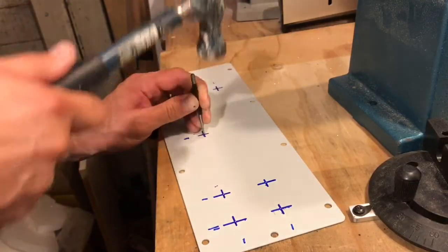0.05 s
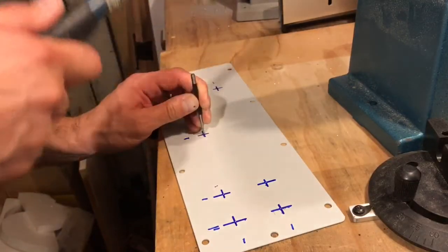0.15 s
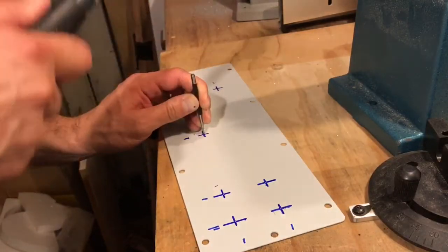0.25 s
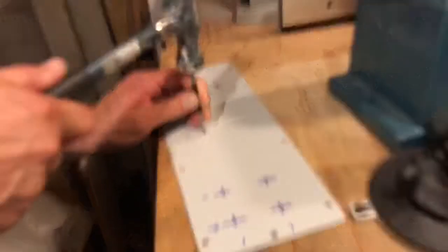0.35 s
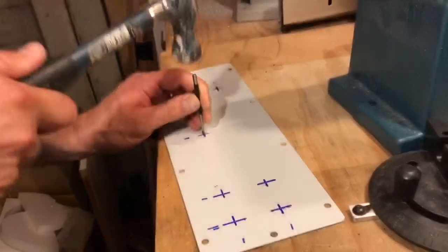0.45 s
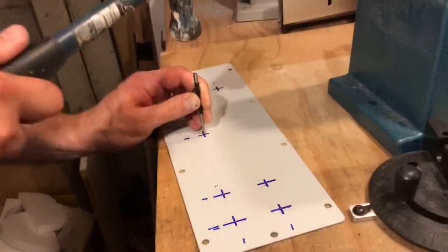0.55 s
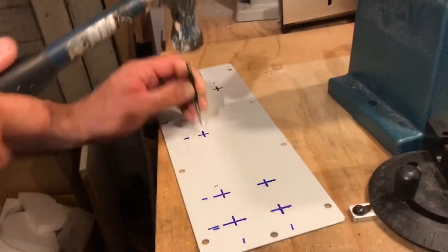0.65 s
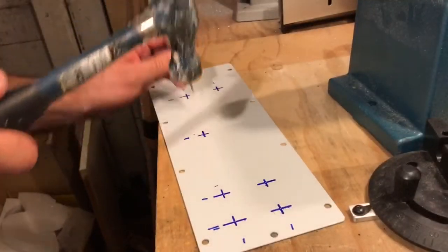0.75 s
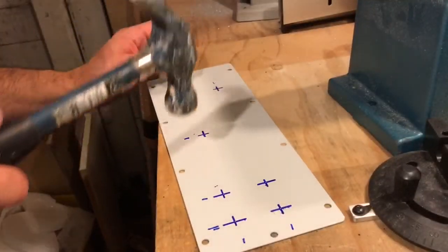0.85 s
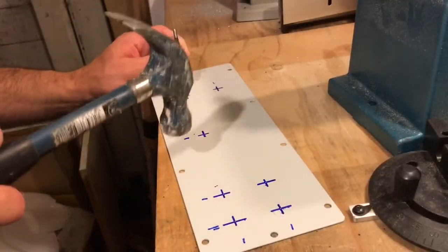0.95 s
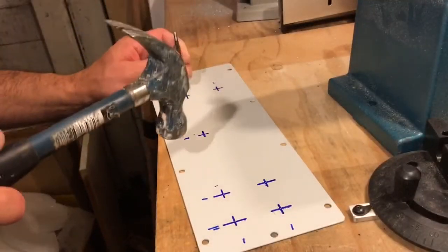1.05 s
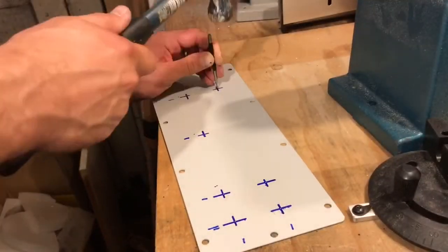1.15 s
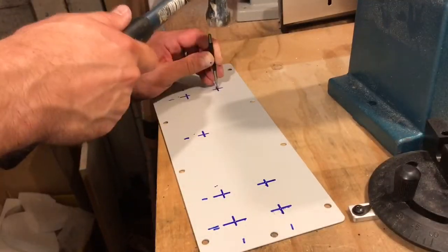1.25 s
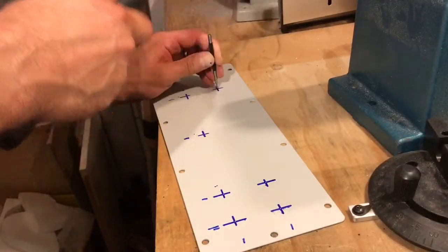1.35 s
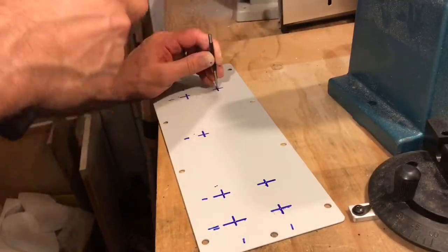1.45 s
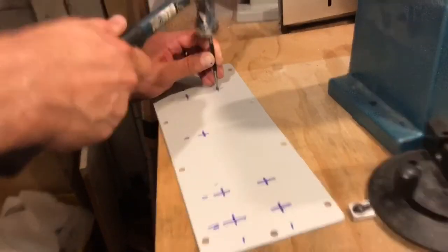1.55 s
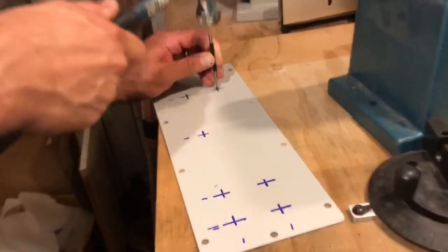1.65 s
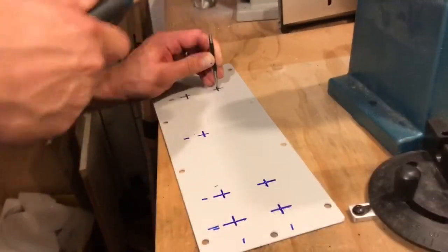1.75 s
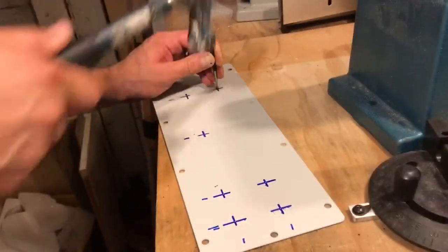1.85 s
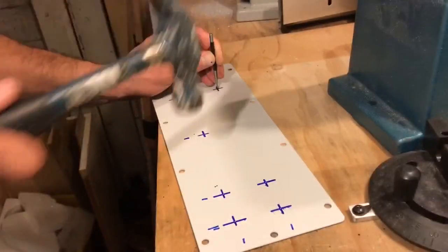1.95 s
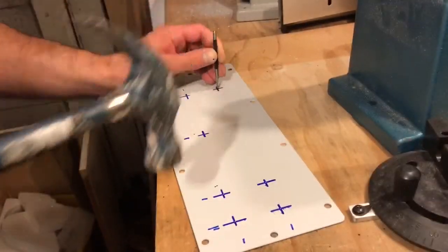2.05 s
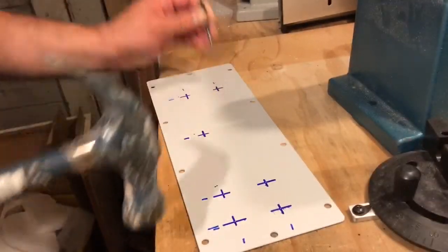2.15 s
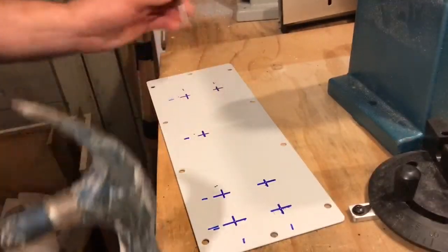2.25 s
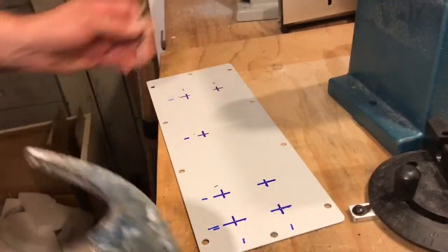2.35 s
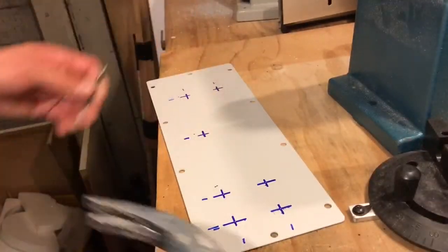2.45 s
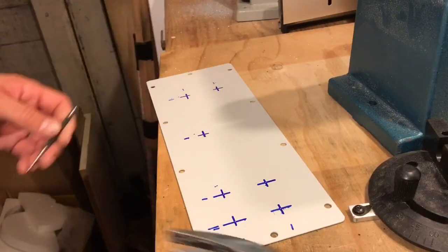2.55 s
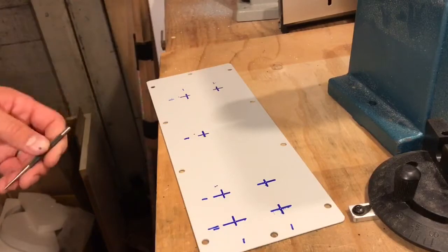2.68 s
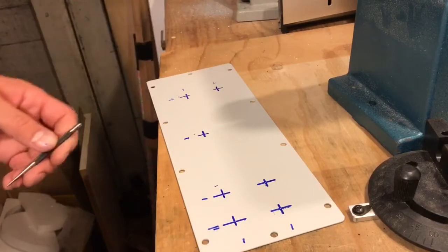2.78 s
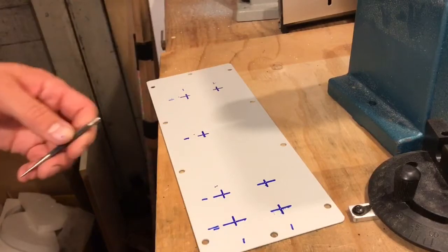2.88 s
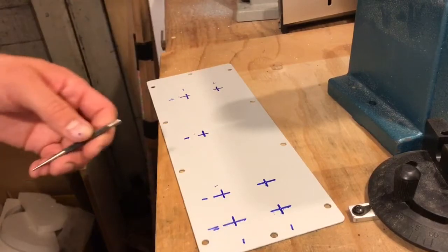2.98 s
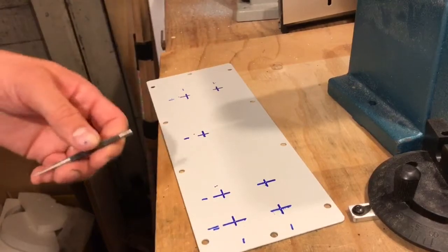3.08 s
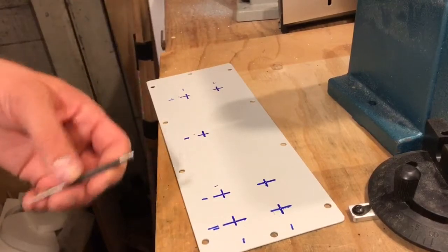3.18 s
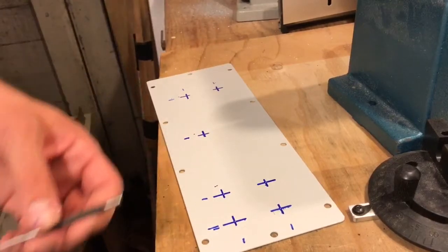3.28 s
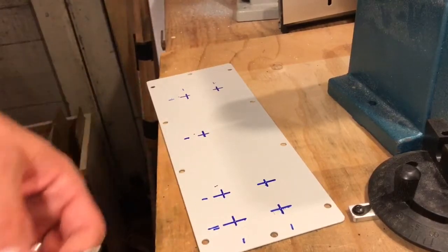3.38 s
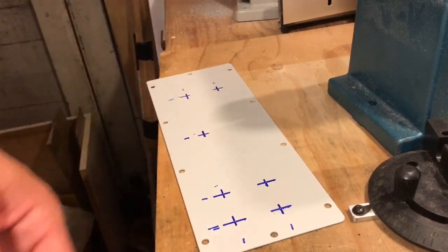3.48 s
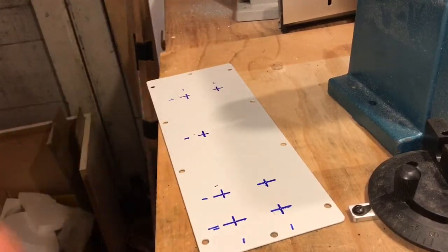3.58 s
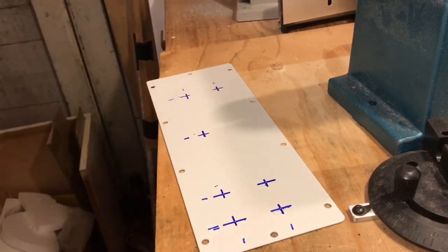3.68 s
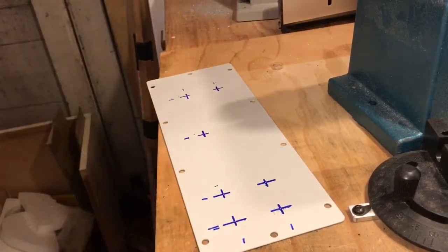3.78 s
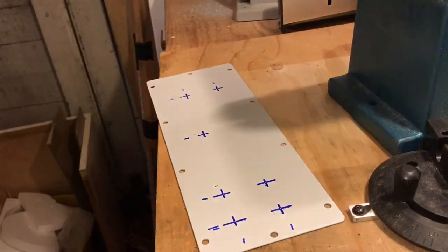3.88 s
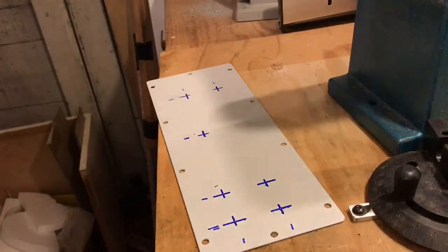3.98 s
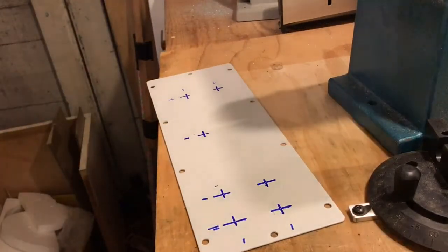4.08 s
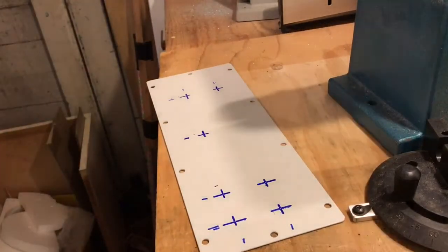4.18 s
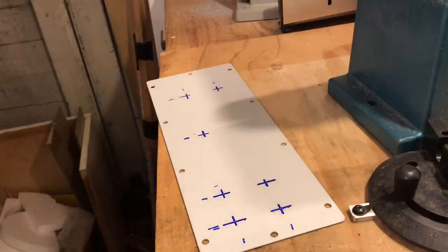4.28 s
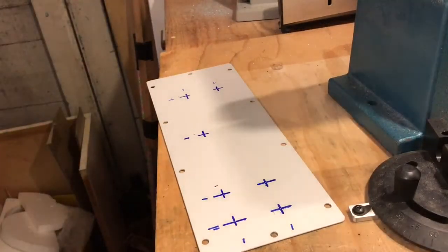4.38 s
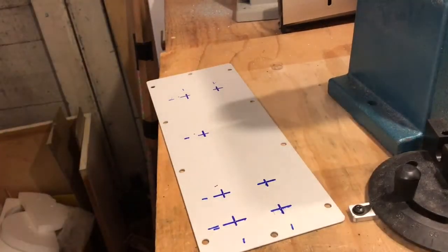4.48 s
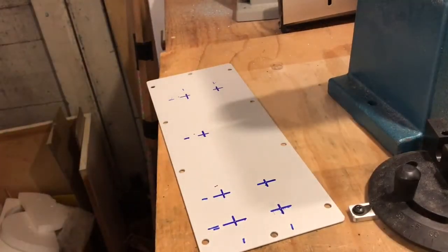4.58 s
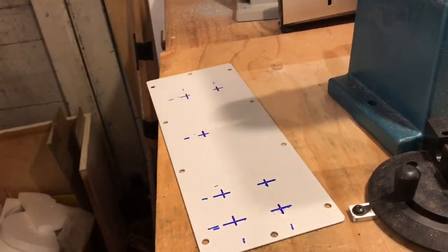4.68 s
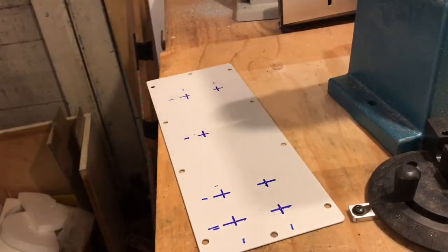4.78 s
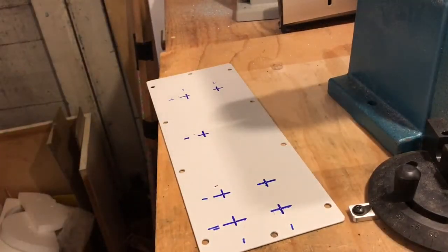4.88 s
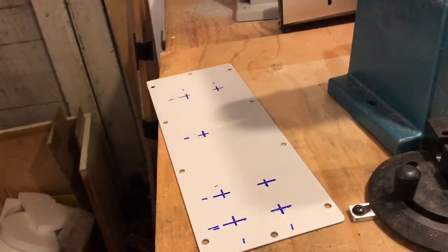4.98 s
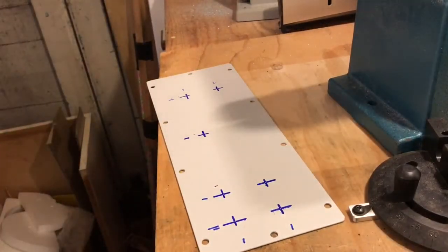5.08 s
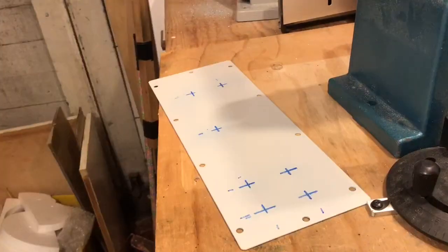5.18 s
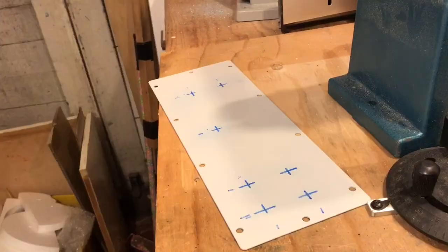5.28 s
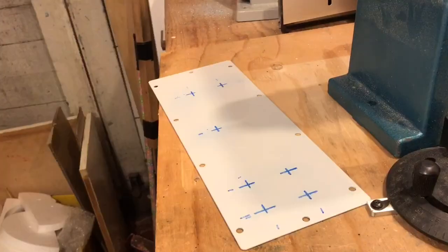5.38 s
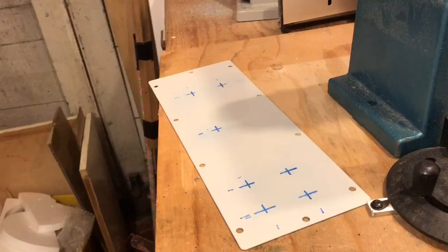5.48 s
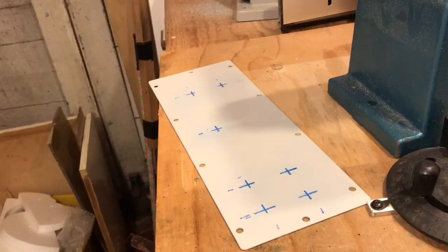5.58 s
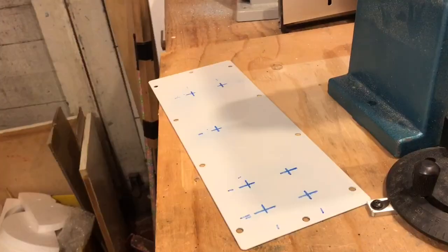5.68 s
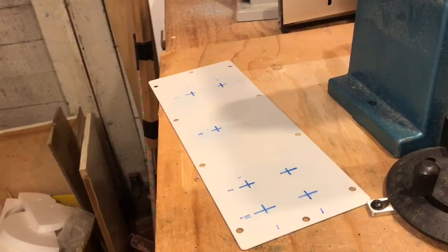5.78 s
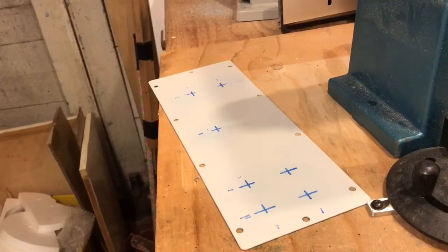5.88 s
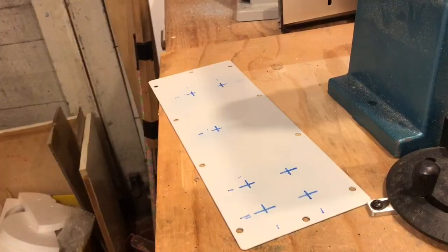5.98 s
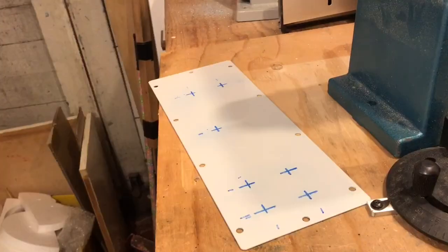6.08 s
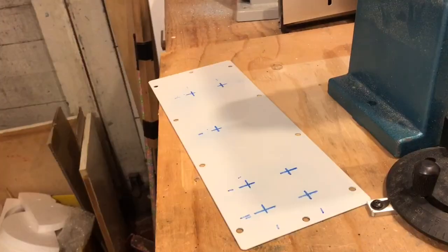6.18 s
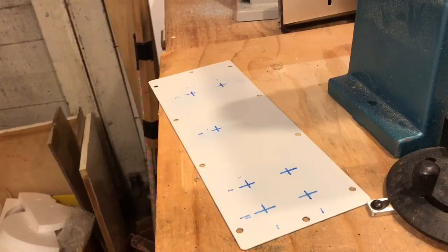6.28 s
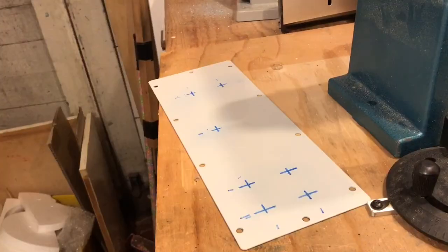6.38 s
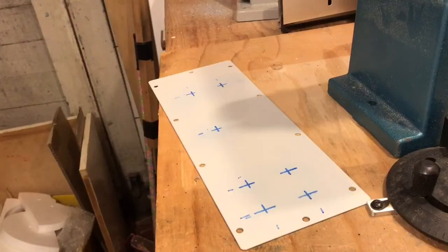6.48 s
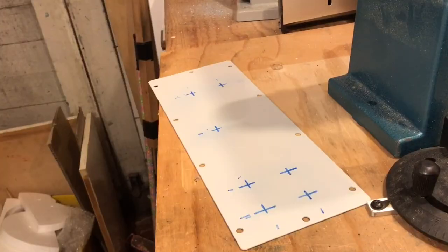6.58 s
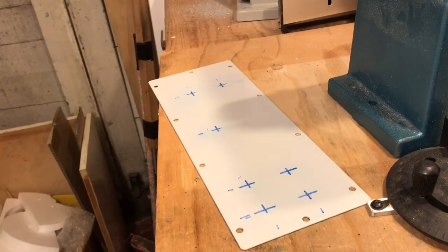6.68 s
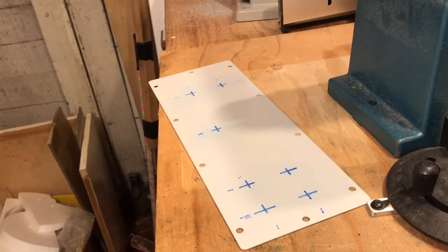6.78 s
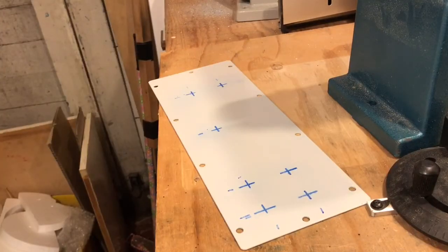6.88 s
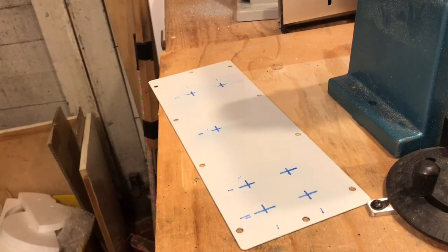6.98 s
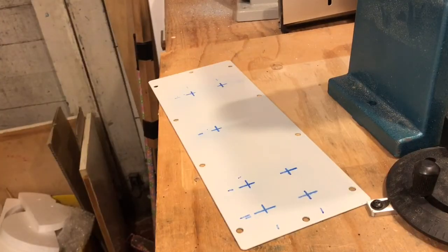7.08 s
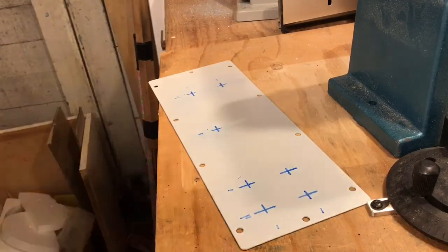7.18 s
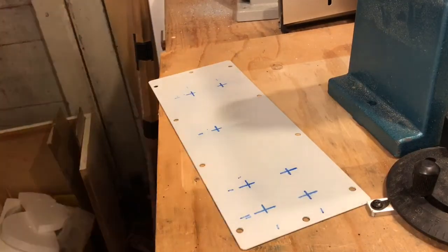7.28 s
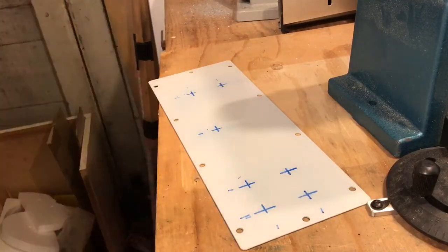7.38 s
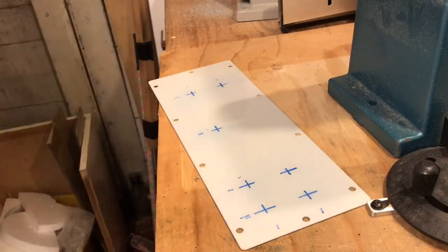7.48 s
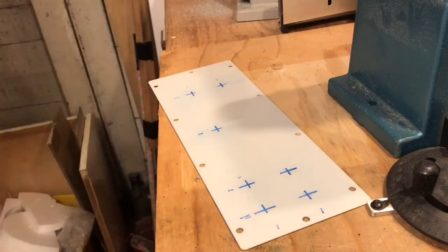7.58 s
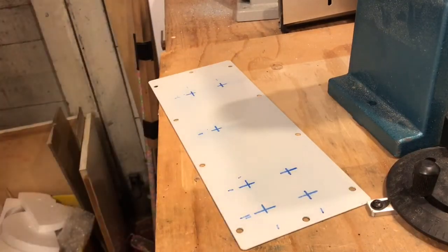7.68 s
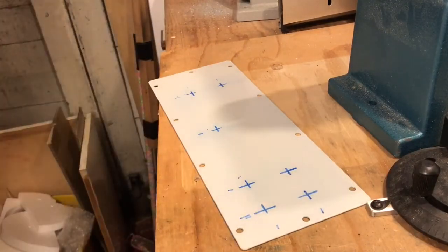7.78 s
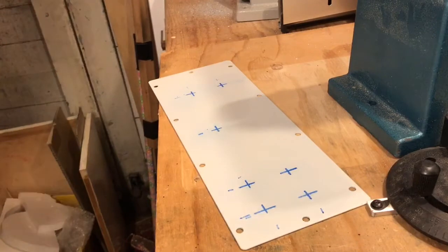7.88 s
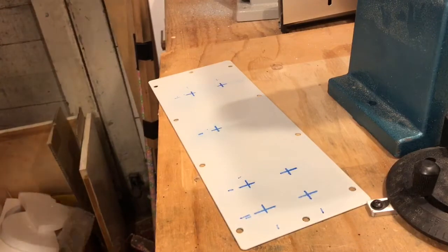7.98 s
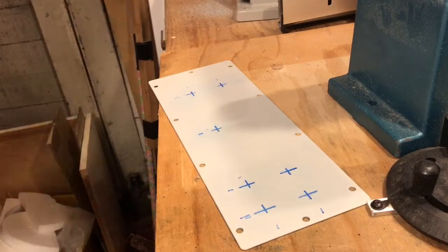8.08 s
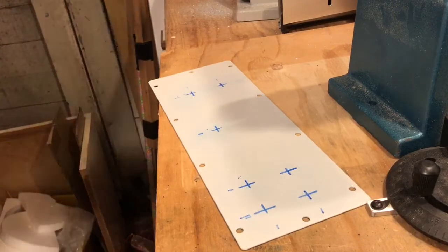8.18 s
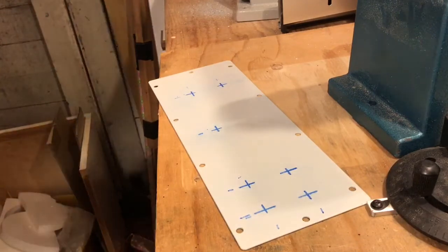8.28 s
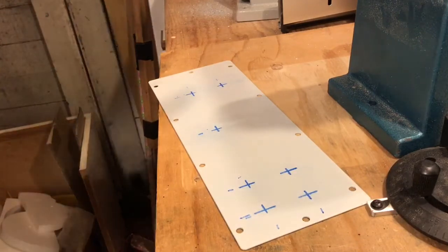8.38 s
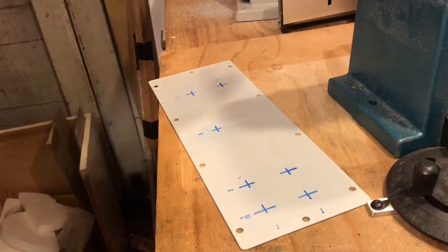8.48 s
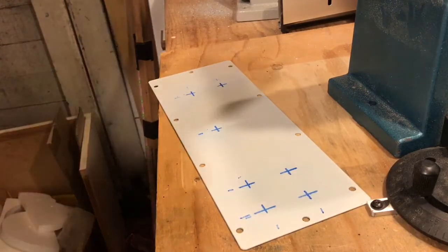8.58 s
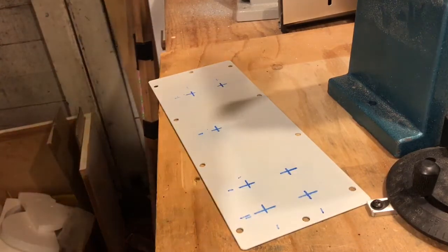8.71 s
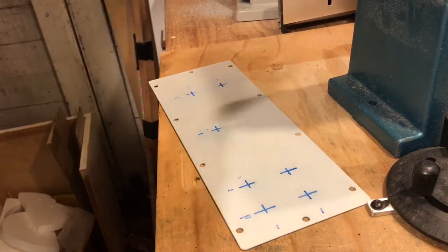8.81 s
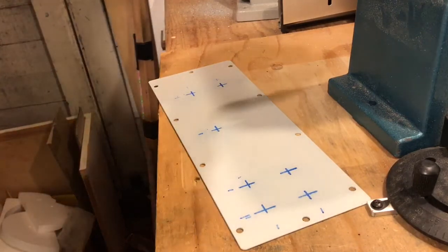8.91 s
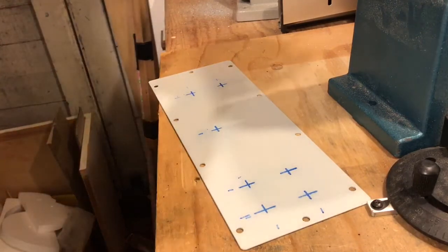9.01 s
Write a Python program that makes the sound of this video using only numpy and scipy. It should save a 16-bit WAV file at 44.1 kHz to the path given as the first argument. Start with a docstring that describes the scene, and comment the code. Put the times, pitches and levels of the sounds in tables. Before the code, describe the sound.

Two loud, sharp hammer blows on a metal punch, then wooden knocks, a dropped tool rolling briefly, and bright little snaps over faint hum.

```python
"""In a small workshop a hammer drives a centre punch into a sheet on a wooden bench, twice. The hammer is
laid down; a steel tool lands, bounces and rolls; small parts clatter, clink, crackle, squeak and snap.
Impacts are noise bursts exciting damped modes, with room reflections; clothes and hands rustle as shaped
noise. Beating tones make a throbbing hum, with faint even ticks over room tone. The level dips briefly twice."""
import sys
import numpy as np
from scipy import signal
from scipy.fft import rfft, irfft
from scipy.io import wavfile

SR = 44100
rng = np.random.default_rng(int(sys.argv[2]) if len(sys.argv) > 2 else 0)


def int16_out(signal):
    """Quantize to a 16-bit WAV file."""
    q = np.round(np.clip(np.atleast_2d(signal).T, -1, 1) * 32767)
    wavfile.write(sys.argv[1], SR, q.astype(np.int16))


N = 399105
T = np.arange(N) / SR   # time/s

# All levels are nominal, ahead of the room, the gain of each section and the microphone.
# Hammer on punch, each blow followed by its rebound:
# t/s, thud level/dB, bench ring level/dB, steel level/dB, steel colour f/Hz
BLOWS = [(0.387, 3, -7, 0.5, 12900), (0.4607, -25, 0, -45, 4570), (1.637, 3.5, -8.5, 6, 11820),
         (1.6797, -13.5, -17.5, -3, 4580)]
# Faint ticks ahead of each main blow: lead t/s, level/dB relative to the blow
TICKS_AHEAD = [(.0235, -23), (.0112, -33)]
# Jolt of the bench at the two main blows: level/dB
JOLT_LEVELS = [-20, -11]
# Knocks on wood, as the hammer is laid down and the tool lands: t/s, level/dB, colour f/Hz, ring level/dB
WOOD_KNOCKS = [(2.8385, -11, 700, -13), (2.858, -16.5, 2400, -19), (2.863, -3, 960, -9),
               (2.871, -11.5, 620, -16), (2.907, -34, 1900, 2), (2.913, -14.5, 570, -5.5),
               (3.049, -8.5, 1000, -14), (3.057, -27, 196, -5), (4.5265, -18, 353, -12)]
# Steel of the dropped tool: t/s, level/dB, colour f/Hz, ring level/dB
DROPPED = [(4.638, -10.5, 3720, -14.5), (4.7322, -10, 4600, -42), (4.7365, -6.5, 4070, -22.5),
           (4.8183, -14, 13300, -11), (4.8442, -8.5, 4100, -25)]
# Clatter of small parts, and the dull clack as the tool lands: t/s, level/dB, colour f/Hz, ring level/dB
CLATTER = [(4.526, -21, 976, -13), (6.275, -16.5, 1350, 2.5), (6.311, -17.5, 3030, -22),
           (6.316, -18.5, 1260, -9), (6.352, -19, 1310, -6), (6.42, -28, 2500, -16),
           (6.424, -17.5, 1460, -0.5), (6.447, -27.5, 810, -7), (6.469, -26.5, 1650, -14)]
# Snaps, then clinks: t/s, level/dB, colour f/Hz, ring level/dB
SNAPS = [(2.361, -43, 13600, -28), (2.4313, -38, 6150, -30), (3.072, -36, 4660, -15),
         (4.053, -44.5, 13000, -28), (8.4146, -22.5, 2093, -12), (8.4293, -8.5, 8400, -3.5),
         (8.4519, -31.5, 3100, -24), (8.8286, -18, 1810, -10), (8.8461, -34, 3540, -28.5),
         (8.8791, -25, 3220, -27), (8.8881, -23, 1200, -1.5)]
CLINKS = [(5.5024, -46.5, 5550, -4), (5.5657, -47.5, 5700, -16), (5.9764, -40.5, 14200, -3),
          (7.3193, -43.5, 14680, 9), (7.863, -44.5, 14360, -1.5), (7.9534, -54, 8360, 3),
          (7.9922, -53, 14200, 4), (8.0114, -49, 8870, -16)]
# Touches of the rolling tool: t/s, level/dB, f/Hz
ROLL_TOUCHES = [(4.9384, -33, 4340), (4.9546, -30, 3250), (4.984, -37, 4300), (5.012, -36, 4300),
                (5.036, -38.5, 3350), (5.055, -38, 3600), (5.097, -44, 3400), (5.1093, -40, 3600),
                (5.1484, -45, 4400)]
# Dry crackles of a handled part: t/s, level/dB
CRACKLES = [(7.596, -55), (7.6161, -61), (7.863, -55), (7.889, -40), (7.9067, -45), (7.933, -46),
            (7.9524, -50), (8.008, -46), (8.0247, -47), (8.0855, -53), (8.1189, -46), (8.1439, -38),
            (8.166, -37)]
# One thin high squeak: t/s, half length t/s, level/dB, f/Hz
SQUEAK = (6.51, .045, -54, 12250)

# Modes of the struck bodies: f/Hz, level/dB, decay t60/s
STEEL_MODES = [(8830, -2.5, 0.012), (9340, -9.5, .04), (11500, -5.5, 0.041), (13170, -9, 0.089)]
BENCH_MODES = [(130.9, -21.5, 0.28), (213.2, 0.5, 0.15), (289.3, -10.5, 0.15), (400, -10, 0.074),
               (430, -41, 1.3), (495, -11.5, 0.09), (600, -21.5, 0.12), (793, -23.5, 0.098)]
JOLT_MODES = [(55, -2, 0.056), (74, -2.5, 0.09)]
WOOD_MODES = [(105.4, -25.5, 0.71), (209.6, -10.5, 0.11), (305.8, 0.5, 0.022), (480, -24, 0.021),
              (622, -5.5, 0.024), (860, -5, 0.018)]
TOOL_MODES = [(1523, -6.5, 0.11), (2390, -38, 0.056), (3744, -5.5, 0.044), (4620, -20.5, 0.084),
              (5430, -13.5, 0.14), (6450, -15, 0.15), (7200, -13, 0.18), (8700, -12.5, 0.12),
              (9580, -10.5, 0.14), (11800, -6, 0.042), (12880, -24, 0.06), (14430, -11, 0.05)]
ROLL_MODES = [(3400, 0, .005), (4380, -2, .005)]
CLATTER_MODES = [(855, -12.5, 0.027), (1452, -3.5, 0.0062), (2385, -21, 0.03)]
CATCH_MODES = [(934, -19.5, 0.011), (2790, -25, 0.017), (9900, 5.5, 0.0052)]
BITS_MODES = [(2400, -17, .03), (4400, -24, .02), (6100, -19, .025), (6800, -19, .02), (7800, -18, .025),
              (8800, -19, .015), (12600, -21, .015), (14000, -12, .015), (15300, -19, .02)]

# Noise spectrum of each kind of contact: f/Hz, relative level per hertz/dB
STEEL_CRACK = [(500, -13), (3000, -0.5), (6000, -5.5), (12000, 2.5), (16000, -10)]
BLOW_CRACK = [(30, -27), (200, -7), (450, -10), (1000, -14), (2200, -20.5), (5000, -33.5), (12500, -34),
              (16000, -50)]
WOOD_CRACK = [(60, -14), (600, -2), (1200, -11), (2600, -25), (5000, -43), (16000, -65)]
TOOL_CRACK = [(100, -10.5), (400, -14.5), (1500, -5), (3800, -7.5), (8000, -12), (16000, -13)]
CLATTER_CRACK = [(150, -19), (400, -8), (1200, -5), (3500, -8), (16000, -18)]
SNAP_CRACK = [(400, -9), (1500, -7.5), (3000, -8.5), (5000, 3.5), (8000, -13), (11000, -3.5), (16000, -6)]
BITS_CRACK = [(800, -10.5), (2400, -8), (5000, -15), (8000, -17), (10500, -18.5), (14000, -17.5),
              (16000, -44)]

# Broad rustles, then narrow scrapes: t/s, half length t/s, level/dB, colour f/Hz
RUSTLES = [(1.935, 0.047, -61, 1840), (2.397, 0.067, -63.5, 4970), (3.0, 0.084, -56, 3500),
           (3.662, 0.027, -58, 2460), (3.7, 0.039, -63, 10970), (4.229, 0.055, -58, 2600),
           (5.048, 0.14, -53.5, 7300), (5.262, 0.067, -57.5, 396), (5.399, 0.02, -53.5, 1020),
           (5.449, 0.037, -58.5, 870), (6.008, 0.027, -55.5, 7150), (6.08, 0.041, -50, 11400),
           (6.753, 0.044, -57.5, 980), (7.176, 0.017, -49.5, 331), (7.786, 0.038, -54, 420),
           (7.802, 0.031, -59.5, 8000), (7.914, 0.044, -59.5, 8050), (8.022, 0.038, -45.5, 164),
           (8.046, 0.038, -60.5, 4940), (8.136, 0.053, -56, 4680), (8.498, 0.073, -56.5, 4940),
           (8.59, 0.16, -57, 8950), (8.725, 0.031, -41.5, 246), (8.756, 0.061, -54.5, 4560),
           (8.931, 0.62, -59.5, 1190), (8.972, 0.071, -51, 7660)]
SCRAPES = [(7.625, 0.043, -62.5, 2400), (8.485, 0.042, -50.5, 1950), (8.59, 0.057, -60, 2000),
           (8.935, 0.048, -50, 2000)]

# Hum and the tones one and two beats below it: level/dB
BEAT_LEVELS = [-56.5, -65.5, -70.5]
# Sections of steady hum and tick phase: start t/s, a tick t/s, a hum crest t/s, beat f/Hz
SECTIONS = [(0, .086, .08, 1.95), (1.17, 1.26, 3.35, 1.95), (5.18, 5.201, 7.43, 1.9)]
# Gain of each section: level/dB
SECTION_GAINS = [-0.5, -2.5, -2.5]
# Brief dips: start t/s, fade-out t/s, hold t/s, depth level/dB
DIPS = [(1.143, 0.0067, 0.031, -33), (5.152, 0.022, 0.0093, -17)]

# Broad room noise: f/Hz, relative level per hertz/dB
AIR = [(12, -42), (20, -9), (101, -2), (158, -8), (261, -8), (443, -18.5), (1150, -24), (1470, -27),
       (1650, -26), (1890, -31.5), (2650, -31.5), (15800, -40)]
# Course of the room noise: t/s, level/dB
AIR_LEVEL = [(0, -58.5), (1.2, -56.5), (2.4, -53), (2.7, -55.5), (5.1, -52), (5.3, -56), (9.05, -54.5)]
# Narrow peaks of the room noise: f/Hz, bandwidth f/Hz, level/dB
AIR_PEAKS = [(271.2, 21, -58.5), (1760, 71, -79.5), (2210, 45, -77.5), (2640, 74, -79.5)]
# Steady low tones: f/Hz, level/dB
RUMBLE = [(36.4, -64), (47.6, -61), (49.3, -60)]
# Reverberation of the room: f/Hz, decay t60/s
ROOM_T60 = [(60, 0.53), (200, 0.35), (1000, .2), (4000, .19), (12000, 0.19)]

THUD_HZ, STEEL_RING_DB = 223, -18
SWELL_AHEAD_S, SWELL_DB = .009, -12   # the swell's level is relative to the thud
MODE_SPREAD_DB = 2.5
ROLL_START_S, ROLL_STOP_S, ROLL_SETTLE_S = 4.91, 5.18, 0.22
ROLL_START_DB, ROLL_STEADY_DB = -46.5, -65
CRACKLE_HZ, SHORT_T60_S = 2400, .009
RUSTLE_OCTAVES_AT_1K, RUSTLE_WIDENS = 2.07, 0.38   # bandwidth; its growth in octaves per octave
HUM_HZ, TICK_S, TICK_DB = 100.1, .1024, -68.5   # TICK_S is the tick period
FADE_IN_S = .021
MIC_DIP_HZ, MIC_DIP_SHARE, CUTOFF_HZ = 10500, .3, 16800


def hammer():
    """Impact excitation: each blow cracks steel on steel and thuds into the bench; main blows also jolt it."""
    steel = [(s, steel_db, hz, STEEL_RING_DB) for s, _, _, steel_db, hz in BLOWS]
    thuds = [(s, thud_db, THUD_HZ, ring_db) for s, thud_db, ring_db, *_ in BLOWS]
    # every other row is a main blow; the rest are rebounds
    ticks = [(s - ahead_s, db + below_db, hz, ring_db)
             for s, db, hz, ring_db in steel[::2] for ahead_s, below_db in TICKS_AHEAD]
    # a soft low swell comes just ahead of each main blow
    low_swells = [(s - SWELL_AHEAD_S, db + SWELL_DB, hz, ring_db) for s, db, hz, ring_db in thuds[::2]]
    jolts = np.zeros(N)
    for (s, *_), jolt_db in zip(BLOWS[::2], JOLT_LEVELS):
        jolts[round(s * SR)] = from_db(jolt_db)
    return (hits(steel, STEEL_MODES, STEEL_CRACK, .0035, .001, 5.0, room_db=-11.5)
            + hits(ticks, STEEL_MODES, TOOL_CRACK, .001, .0003, 1.5, room_db=-3, size=4096)
            + hits(thuds, BENCH_MODES, BLOW_CRACK, .014, .009, 1.3, room_db=-6, ring_in_room_db=-14,
                   split_share=.004, size=32768)
            + hits(low_swells, [], WOOD_CRACK, .008, .012, 30, room_db=-20, size=4096)
            + sum(from_db(db) * ring(jolts, hz, t60) for hz, db, t60 in JOLT_MODES))


def wood_knocks():
    """Modal response of wood: the hammer laid down and the tool landing excite low, damped modes."""
    return hits(WOOD_KNOCKS, WOOD_MODES, WOOD_CRACK, .0065, .0012, 9.8, room_db=-10.5,
                ring_in_room_db=2.0, size=32768)


def dropped_tool():
    """Modal response of steel: each bounce of the tool excites a dense set of high modes."""
    return hits(DROPPED, TOOL_MODES, TOOL_CRACK, .0026, .001, 8.7, room_db=-1.5,
                ring_in_room_db=0.0, split_share=.007)


def rolling():
    """Repeated impact: the flats of the tool tick on wood at uneven gaps, exciting two short resonances."""
    at = np.cumsum(rng.uniform(.002, .012, 3000) * SR).astype(int)
    at = at[at < N]
    ticking = 0
    for hz, level_db, t60 in ROLL_MODES:
        clicks = np.zeros(N)
        clicks[at] = from_db(level_db + rng.normal(0, 6, len(at)))   # each tick favours one mode or the other
        ticking = ticking + ring(np.diff(clicks, prepend=0), hz, t60)
    # the roll starts lively and settles
    settling = np.exp(-np.abs(T - ROLL_START_S) / ROLL_SETTLE_S)
    level_db = ROLL_STEADY_DB + (ROLL_START_DB - ROLL_STEADY_DB) * settling
    active = (T > ROLL_START_S) & (T < ROLL_STOP_S)
    dry = from_db(level_db) * active * rms_one(ticking)
    return with_room(dry) + short_rings(ROLL_TOUCHES)


def clatter():
    """Strong damping: small parts clatter, and the landing tool clacks dully, through very short modes."""
    return hits(CLATTER, CLATTER_MODES, CLATTER_CRACK, .0068, .00033, 4.9, room_db=-1.0)


def snaps():
    """Brief contact: each snap is a short bright burst with a few rapidly damped modes."""
    return hits(SNAPS, CATCH_MODES, SNAP_CRACK, .0036, .0011, 11.9, room_db=-12.5)


def clinks():
    """Small stiff bodies resonate high: each clink excites short treble modes with much room reflection."""
    return hits(CLINKS, BITS_MODES, BITS_CRACK, .0064, .00044, 13.8, room_db=4.0)


def crackles():
    """Damped oscillation: each crackle of the handled part is one very short ring at a common pitch."""
    return short_rings([(s, db, CRACKLE_HZ) for s, db in CRACKLES])


def squeak():
    """Narrow-band resonance: noise drives one sharp mode, which swells and fades as the clatter dies."""
    s, half_s, level_db, hz = SQUEAK
    tone = rms_one(ring(rng.standard_normal(N), hz, 0.032))
    return from_db(level_db) * tone * np.exp(-((T - s) / half_s) ** 2)


def rustle():
    """Friction noise: brushes of cloth, hand or foot are broad; the scraping keeps to a narrow band."""
    def brush_octaves(hz):   # brighter brushes are broader
        return max(RUSTLE_OCTAVES_AT_1K + RUSTLE_WIDENS * np.log2(hz / 1000), .5)
    return swells(RUSTLES, brush_octaves, grain_db=2) + swells(SCRAPES, lambda hz: 1, grain_db=3)


def hum_and_ticks():
    """Superposition: close tones beat into a slow throb under an even bright tick; phases reset each section."""
    _, tick, crest, beat = np.transpose(SECTIONS)
    section = section_index()
    since = T - crest[section]
    hum = sum(from_db(level_db) * np.sqrt(2) * np.cos(2 * np.pi * (HUM_HZ - k * beat[section]) * since)
              for k, level_db in enumerate(BEAT_LEVELS))
    pulse = np.exp(-((T - tick[section] + .001) % TICK_S) / .0012)   # starts 1 ms early
    bright = noise([(9000, -32.0), (12500, -4.0), (15800, 2.5)], N)
    return hum + from_db(TICK_DB) * pulse * bright


def room_tone():
    """Stationary spectra: broad air noise of drifting level, narrow noisy peaks and steady low tones."""
    s, level = np.transpose(AIR_LEVEL)
    out = from_db(np.interp(T, s, level)) * noise(AIR, N)
    for hz, width_hz, level_db in AIR_PEAKS:
        t60 = np.log(1000) / (np.pi * width_hz)   # bandwidth is inverse to decay time
        out += from_db(level_db) * rms_one(ring(rng.standard_normal(N), hz, t60))
    for hz, level_db in RUMBLE:
        out += from_db(level_db) * np.sqrt(2) * np.sin(2 * np.pi * (hz * T + rng.random()))
    return out


def hits(events, modes, crack, crack_s, rise_s, hump_db, room_db, ring_in_room_db=-5, split_share=.0065, size=12288):
    """Modal synthesis: a contact noise burst, the damped modes of the struck body and the room's reply to both."""
    out = np.zeros(N + 60000)
    t = np.arange(size) / SR
    for (s, peak_db, hump_hz, ring_db), tail in zip(events, room_tails(count=len(events))):
        burst = .5 * noise(crack, size, hump_hz, hump_db, 0.35) * np.exp(-t / crack_s)
        burst *= 1 - np.exp(-4 * t / rise_s)   # a softer contact blunts the front
        rings = 0
        for (hz, level_db, t60), (chance, turn, split) in zip(modes, rng.normal(0, 1, (len(modes), 3))):
            # the spot that is struck favours the modes near its own colour
            favour_db = hump(hz, hump_hz, hump_db, 0.69) + MODE_SPREAD_DB * chance
            strength = from_db(level_db + ring_db + favour_db)
            # every mode is a close pair that starts in step and beats
            partner_hz = hz * (1 + split_share * split)
            pair = np.sin(2 * np.pi * hz * t + turn) + .7 * np.sin(2 * np.pi * partner_hz * t + turn)
            rings = rings + strength * pair * from_db(-60 * t / t60)
        rings = rings * (1 - np.exp(-t / rise_s))   # the body takes a moment to speak
        sent = burst + from_db(ring_in_room_db) * rings
        heard = from_db(room_db) * signal.fftconvolve(sent, tail)   # every hit has its own echoes
        heard[:size] += burst + rings
        at = round(s * SR)
        out[at:at + len(heard)] += from_db(peak_db) * heard
    return out[:N]


def short_rings(rows):
    """Damped oscillation: single touches ring briefly at their own pitch, with a little room."""
    dry = np.zeros(N)
    t = np.arange(2048) / SR
    for s, peak_db, hz in rows:
        at = round(s * SR)
        dry[at:at + len(t)] += from_db(peak_db - 60 * t / SHORT_T60_S) * np.sin(2 * np.pi * hz * t)
    return with_room(dry)


def swells(rows, octaves_at, grain_db):
    """Stick and slip: friction noise swells about its own colour, its level lumpy as the grip catches."""
    size = 32768
    out = np.zeros(N + size)
    t = (np.arange(size) - size // 2) / SR
    for s, half_s, level_db, hz in rows:
        friction = noise([(20, 0), (20000, 0)], size, hz, 40, octaves_at(hz))
        lumps = noise([(20, 0), (120, 0), (300, -40), (20000, -90)], size)
        grainy = rms_one(friction * from_db(grain_db * lumps))
        at = round(s * SR)
        out[at:at + size] += from_db(level_db) * grainy * np.exp(-(t / half_s) ** 2)
    return out[size // 2:][:N]


def ring(clicks, hz, t60):
    """Two-pole resonance: a unit click sets a decaying sine of height 1 ringing."""
    r, w = from_db(-60 / (t60 * SR)), 2 * np.pi * min(hz, 16000) / SR
    return signal.lfilter([0, np.sin(w)], [1, -2 * r * np.cos(w), r * r], clicks + 1e-18)


def noise(spectrum, size, hump_hz=1000, hump_db=0, octaves=1):
    """Spectral shaping: noise of rms 1 with a given spectrum and a hump on it, band-limited at the top."""
    hz = np.fft.rfftfreq(size, 1 / SR) + 1
    gain = from_db(at_hz(spectrum, hz) + hump(hz, hump_hz, hump_db, octaves)) * (hz < 15850)
    return rms_one(irfft(rfft(rng.standard_normal(size)) * gain, size))


def room_tails(count, size=14000):
    """Reverberation: half-octave noise bands build up in a few ms and each dies at its own rate."""
    t, out = np.arange(size) / SR, 0
    edges = 40 * 2 ** np.arange(0, 8.8, .5)
    white = rng.standard_normal((2, count, size))   # neighbouring bands get unrelated noise
    for k, (low, high) in enumerate(zip(edges, edges[1:])):
        band_pass = signal.butter(2, [low, high], "band", fs=SR, output="sos")
        band = signal.sosfilt(band_pass, white[k % 2])
        out = out + band * from_db(-60 * t / at_hz(ROOM_T60, np.sqrt(low * high)))
    out = out * (1 - np.exp(-t / 0.0027))
    return out / np.sqrt(np.sum(out ** 2, axis=1, keepdims=True))


def with_room(dry):
    """Convolution: the direct sound plus its reflections 10 dB down."""
    return dry + from_db(-10) * signal.fftconvolve(dry, room_tails(count=1)[0])[:N]


def hump(hz, centre_hz, top_db, octaves):
    """Resonance colour: a bell on a log-frequency axis, in dB."""
    return top_db * np.exp(-.5 * (np.log2(hz / centre_hz) / octaves) ** 2)


def at_hz(points, hz):
    """Interpolation along a log-frequency axis."""
    points_hz, values = np.transpose(points)
    return np.interp(np.log(hz), np.log(points_hz), values)


def from_db(db):
    """Amplitude ratio of a level in dB."""
    return 10 ** (np.asarray(db) / 20)


def rms_one(x):
    """Normalisation to unit rms."""
    return x / np.sqrt(np.mean(x ** 2) + 1e-20)


def section_index():
    """Step function of time: the section that each sample belongs to."""
    return np.searchsorted(np.transpose(SECTIONS)[0], T, "right") - 1


def level_course_db():
    """Gain law in dB: one gain per section, with two dips that fade out, hold and fade in."""
    gain_db = np.array(SECTION_GAINS)[section_index()]
    for s, fade_s, hold_s, depth_db in DIPS:
        fade_out = np.clip((T - s) / fade_s, 0, 1)
        fade_in = np.clip(1 - (T - s - fade_s - hold_s) / FADE_IN_S, 0, 1) ** 2
        gain_db = gain_db + depth_db * fade_out * fade_in
    return gain_db


def scene():
    """Superposition of all sources, from the hammer to the room tone."""
    struck = hammer() + wood_knocks() + dropped_tool() + rolling() + clatter() + snaps() + clinks()
    handled = crackles() + squeak() + rustle()
    return (struck + handled + hum_and_ticks() + room_tone())[None]


def record(dry):
    """Transduction: a treble dip, soft overload of the loudest peaks, the level course and a steep low-pass."""
    dip_band = [.93 * MIC_DIP_HZ, 1.07 * MIC_DIP_HZ]
    dip = signal.sosfilt(signal.butter(1, dip_band, "band", fs=SR, output="sos"), dry)
    heard = dry - MIC_DIP_SHARE * dip
    held = heard / (1 + np.abs(heard / .9) ** 4) ** (1 / 4)
    levelled = held * from_db(level_course_db())
    return signal.sosfilt(signal.cheby2(12, 70, CUTOFF_HZ, fs=SR, output="sos"), levelled)


dry = scene()
out = record(dry)
int16_out(out)
```